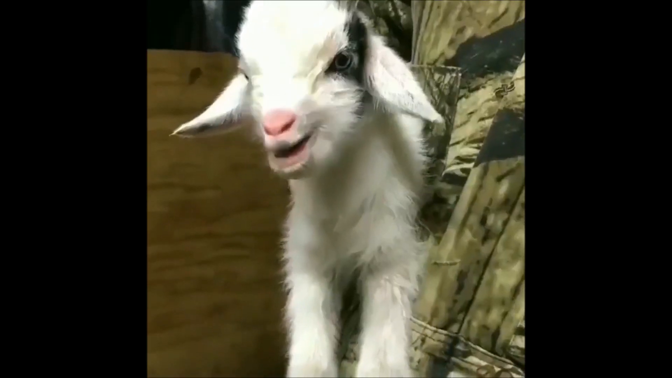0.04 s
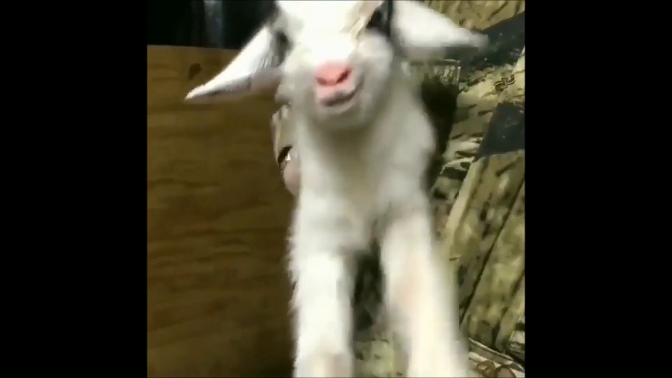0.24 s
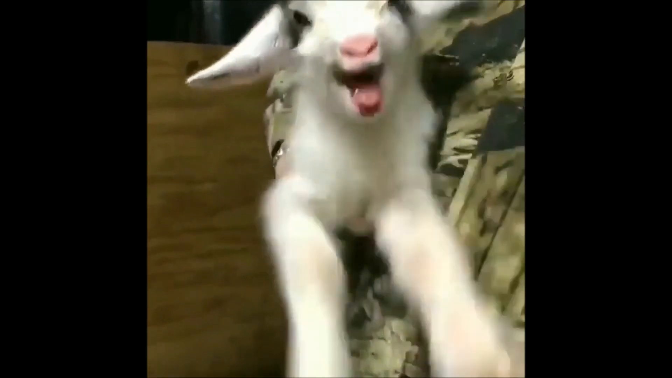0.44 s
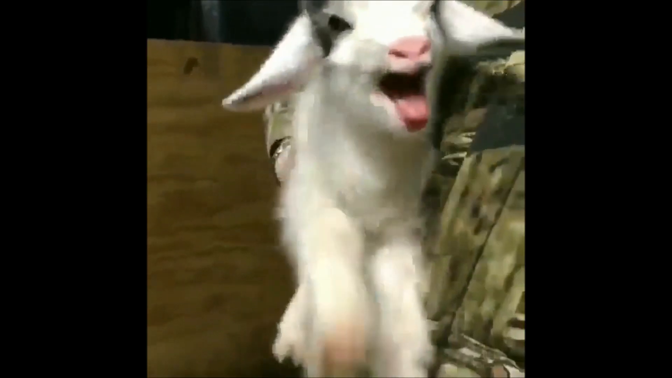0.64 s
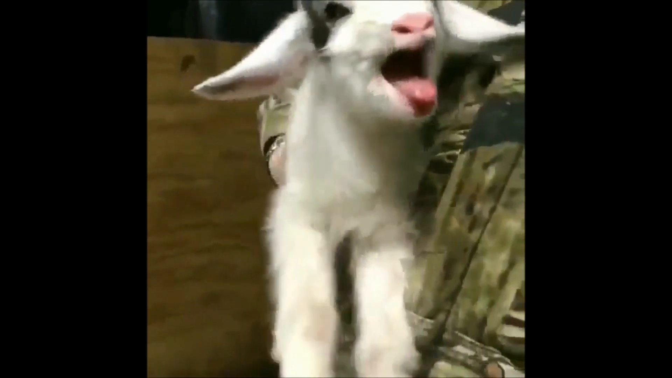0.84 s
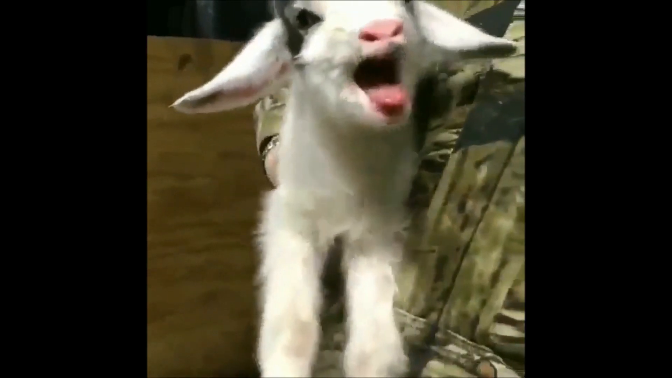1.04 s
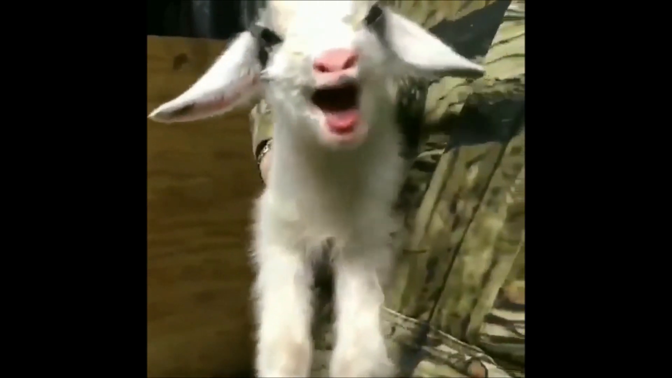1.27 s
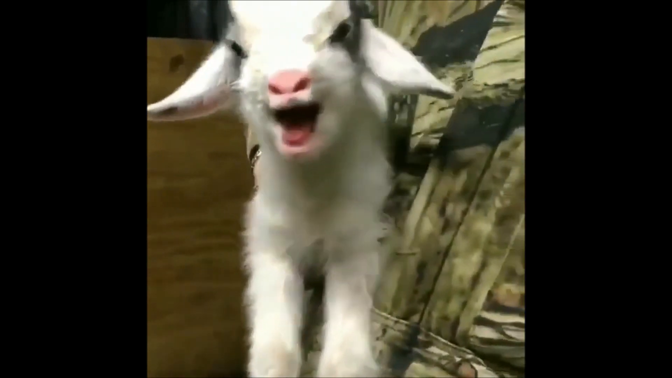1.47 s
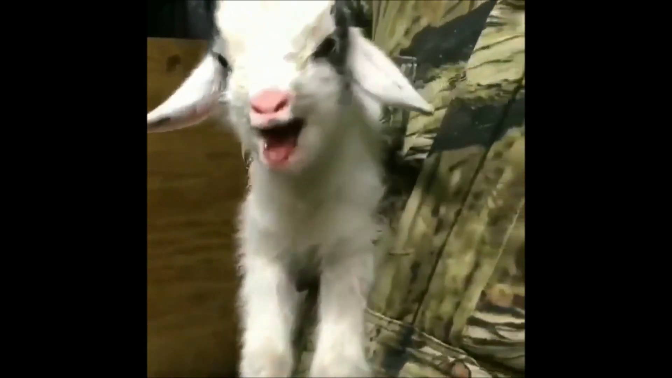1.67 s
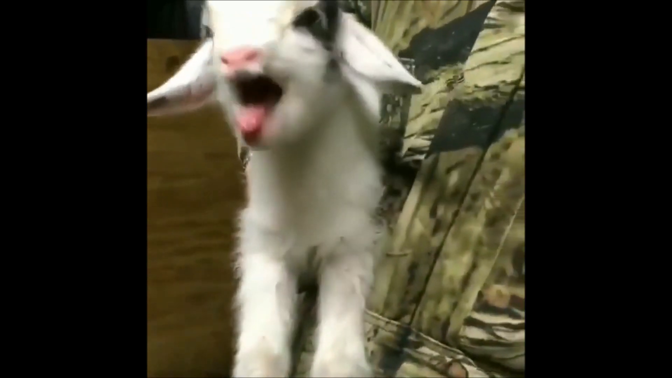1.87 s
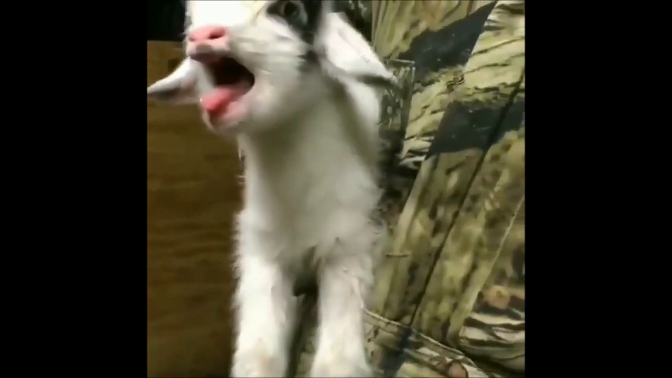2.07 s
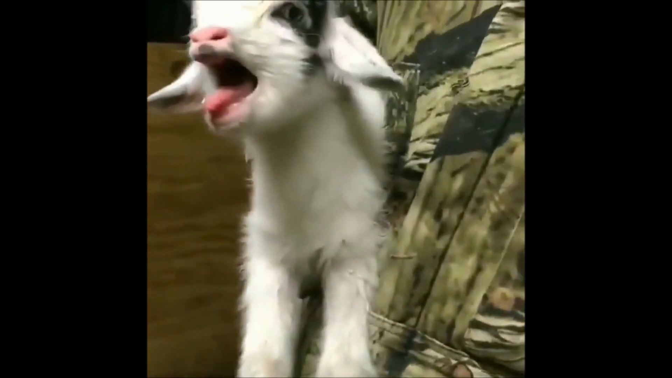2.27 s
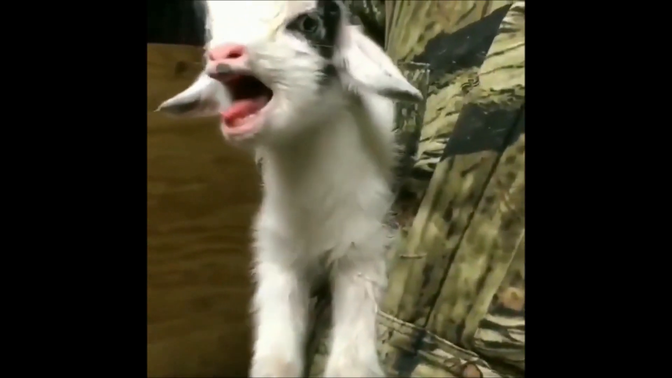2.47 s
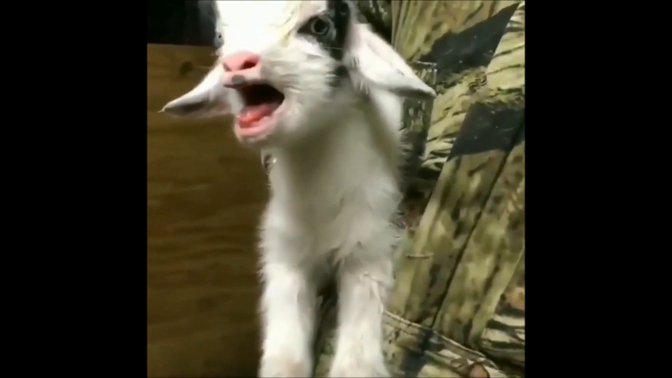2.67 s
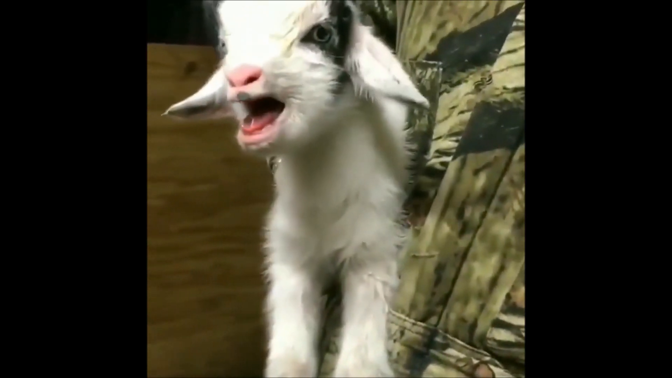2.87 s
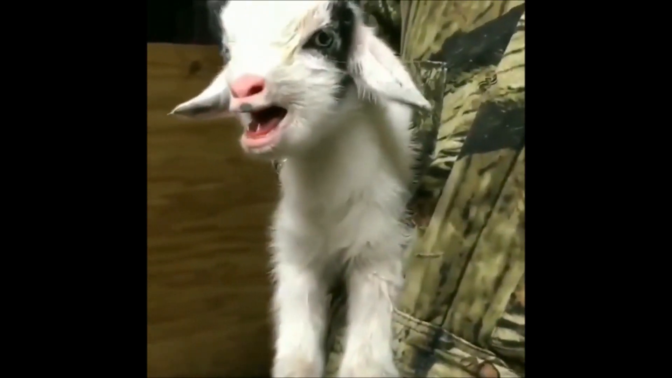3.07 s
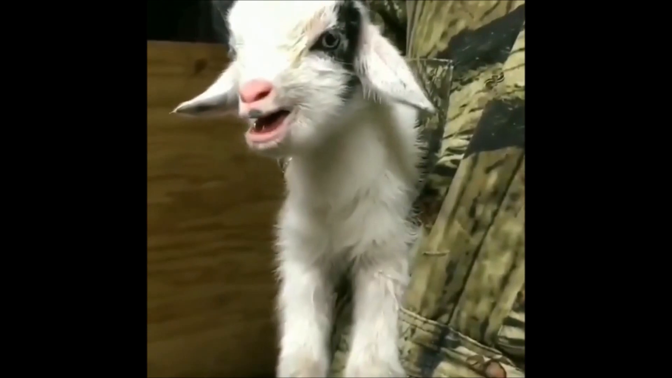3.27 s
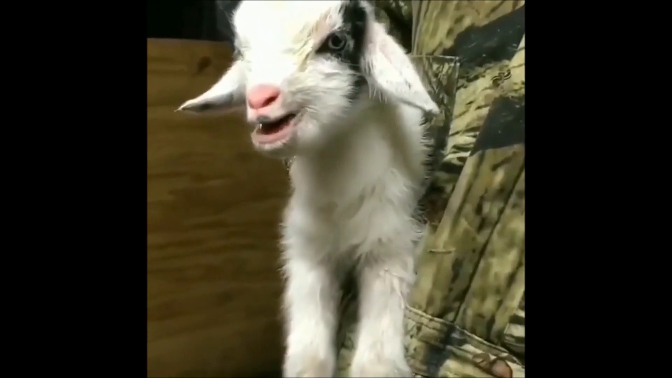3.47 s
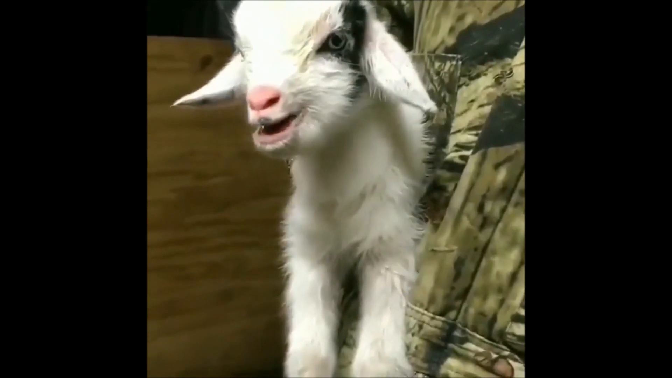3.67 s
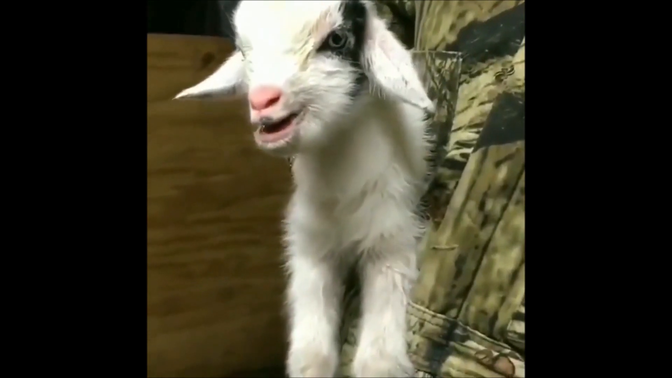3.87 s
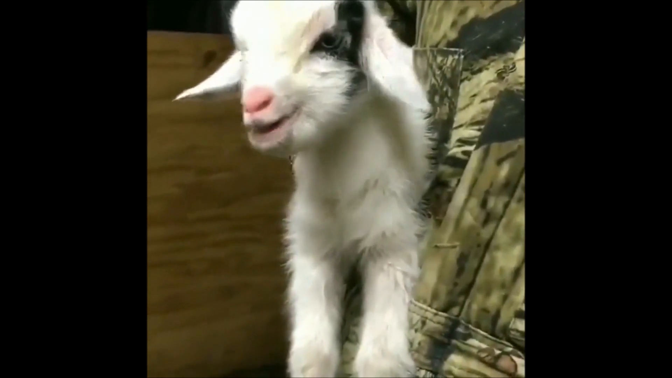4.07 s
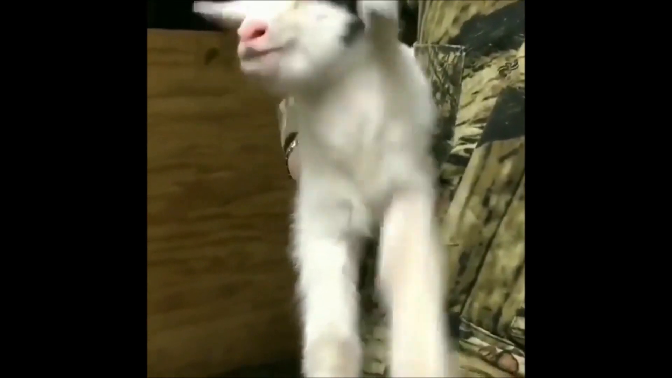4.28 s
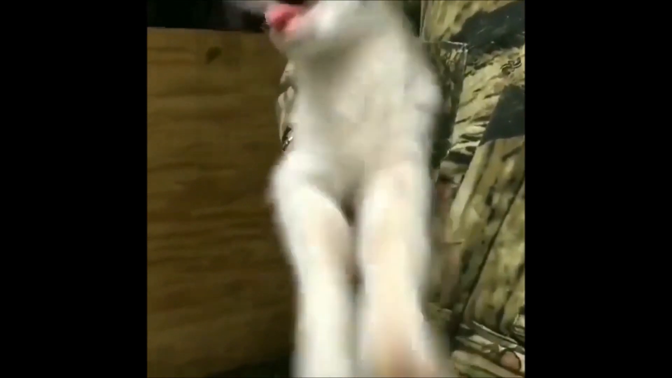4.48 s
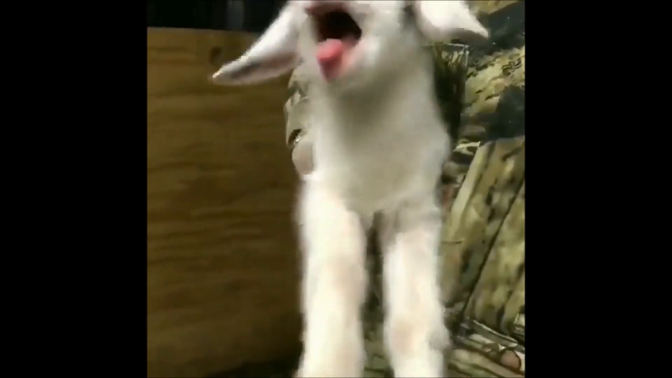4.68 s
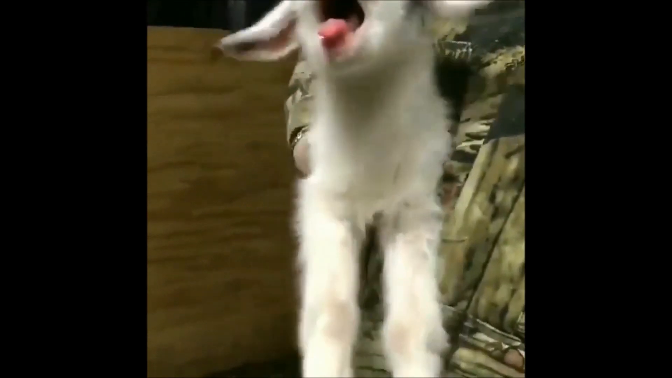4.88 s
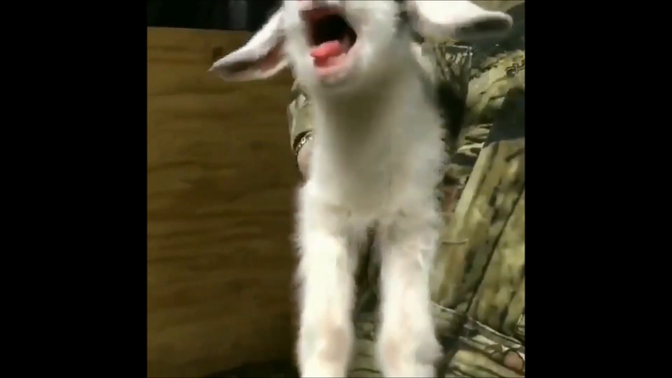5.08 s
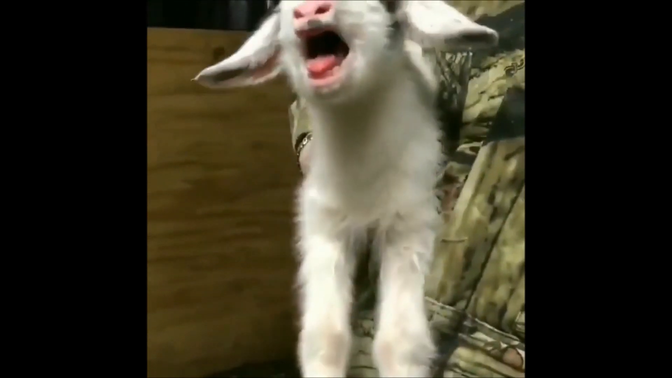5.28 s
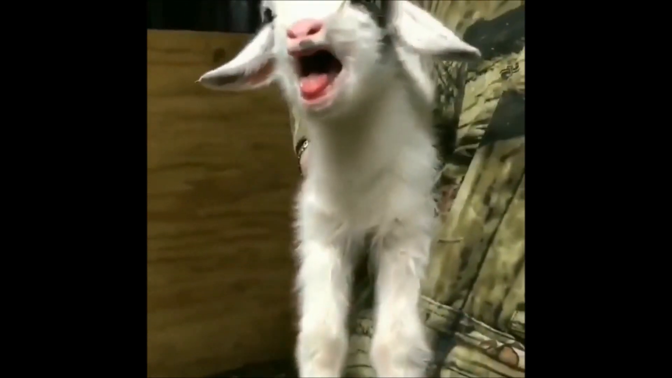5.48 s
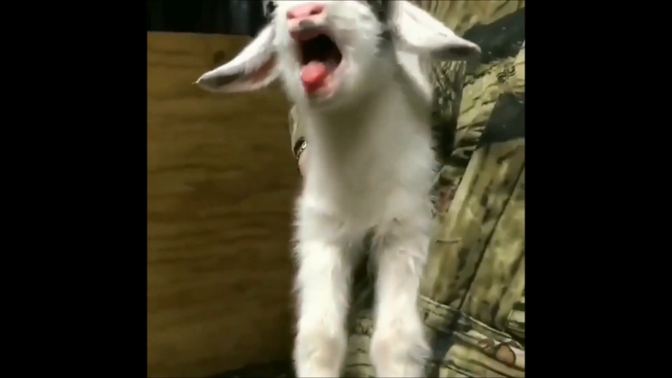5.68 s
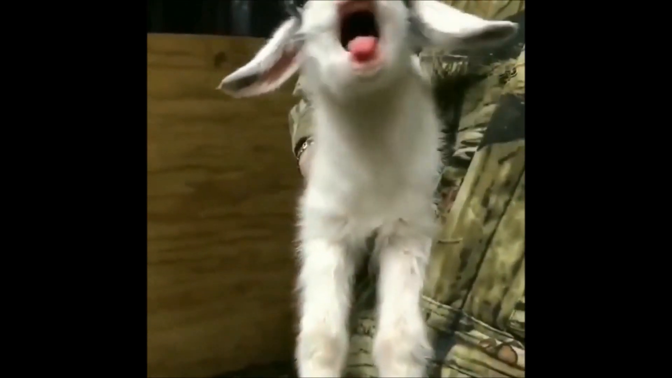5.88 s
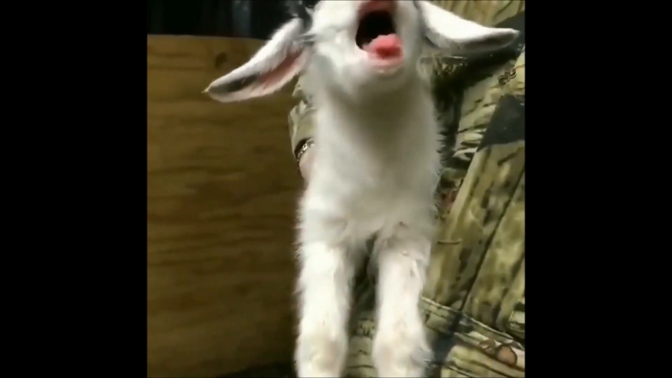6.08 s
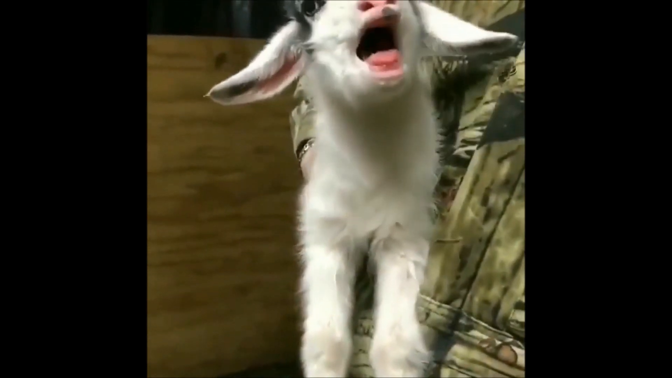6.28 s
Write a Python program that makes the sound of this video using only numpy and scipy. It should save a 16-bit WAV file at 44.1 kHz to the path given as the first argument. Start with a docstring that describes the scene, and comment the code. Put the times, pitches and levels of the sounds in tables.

```python
"""In a small wooden pen, a goat kid close by bleats four times, in two pairs.
Each cry scoops up, quavers once, crests and sags. The vocal folds snap about 700 times a second and
drive the resonances of nose and throat; they slip into long-short pairs and turn hoarse, and the
resonances climb as the mouth opens. The boards return a short echo. Between the cries one hears
a low rumble, a faint hum and a little shuffling."""
import sys
import numpy as np
from scipy import signal
from scipy.fft import rfft, irfft
from scipy.io import wavfile
from scipy.ndimage import uniform_filter1d, minimum_filter1d

SR = 44100
rng = np.random.default_rng(int(sys.argv[2]) if len(sys.argv) > 2 else 0)


def file_out(sig):
    """Save sig as 16-bit WAV at sys.argv[1]."""
    # one column per channel
    cols = np.atleast_2d(sig).T
    # limit, then scale
    lim = np.clip(cols, -1, 1)
    pcm = np.round(lim * 32767).astype(np.int16)
    wavfile.write(sys.argv[1], SR, pcm)


N = 279192

# The cries, one a row, each in four groups:
# timing (start [s], burst into full voice [s], end [s]),
# tune (crest [s], crest [Hz], sag [Hz/s], quaver [s], quaver scale [Hz], scoop [Hz], final drop [Hz]),
# strength (low formants [dB], upper formants [dB], overtone [dB], lead-in [dB], upper fade [dB]),
# manner (mouth opens [s], opening [0-1], hoarseness [0-1], early rasp [0-1], doubling onset [s])
CRIES = [((.403, .444, 1.0693), (.685, 733, 215, .492, 32, 77, 56), (-12, -9.5, -25, -34, 2.5),
         (.51, .62, .16, 0.23, .66)), ((1.678, 1.722, 2.4164), (1.983, 738, 312, 1.825, 37, 148, 80),
         (-13.5, -10, -18, -9, 9.5), (1.69, .7, 0.29, .2, 2.2)), ((4.368, 4.428, 4.997),
         (4.648, 743, 270, 4.488, 27, 90, 65), (-13, -11.5, -29.5, -35.5, 0),
         (4.505, 0.59, 0.27, .02, 4.71)), ((5.402, 5.585, 6.106), (5.66, 703, 119, 5.587, 50, 18, 82),
         (-16.5, -11, -22, -27, 4), (5.41, 0.69, 0.5, .05, 5.52))]
# Resonances of the nose (first row) and throat:
# (mouth narrow [Hz], half open [Hz], wide [Hz], bandwidth [Hz], relative level [dB])
FORMANTS = [(1350, 1300, 1400, 410, -18), (1680, 2200, 2607, 330, -0.5), (3290, 4950, 4750, 530, 8.5),
            (6300, 6610, 6760, 1200, 8), (8700, 8550, 8500, 800, 1.5), (12900, 12000, 12300, 3300, -1)]
# The folds lock briefly into a piercing tone: (centre [s], length [s], frequency [Hz], level [dB])
VOICE_CRACKS = [(.641, .016, 5050, -9.5), (.726, 0.019, 5120, -9), (1.704, .012, 2440, -27),
                (1.879, .017, 4900, -8.5), (1.923, .013, 6600, -13), (5.636, 0.018, 6200, -9)]
# Modes of the mouth after a click: (frequency [Hz], relative level [dB], t60 [s])
CLICK_MODES = [(657, -23, 0.1), (1464, -6, 0.091), (1771, 3.5, .06), (2280, -1.5, .06), (2659, -8, .07),
               (3338, 2, 0.0791), (7200, -2, 0.084)]
# Reflections from the nearest boards: (delay [s], level [dB])
BOARD_ECHOES = [(.0009, -17), (.0019, -10), (.0034, -10)]
# Reverberation time of the pen: (frequency [Hz], t60 [s])
PEN_DECAY = [(500, .22), (2300, 0.35), (3300, .22), (5000, 0.26), (9000, .22), (13000, .17)]
# Soft shuffling movements: (time [s], length [s], scrape level [dB], bump level [dB])
SHUFFLE_EVENTS = [(1.173, 0.26, -63, -69), (1.396, 0.077, -61.5, -60), (2.52, 0.23, -69, -77),
                  (2.697, .11, -62.5, -70), (2.969, 0.09, -75, -53), (3.437, 0.099, -69, -51.5),
                  (5.165, 0.28, -65.5, -65), (6.193, 0.21, -72.5, -56.5)]
# Noise spectra of scrape, bump and background: (frequency [Hz], relative spectral density [dB])
SCRAPE_SPECTRUM = [(200, -13), (1400, -2), (2800, -1), (4500, -5.5), (13000, -14.5)]
BUMP_SPECTRUM = [(25, -25), (80, 10.5), (220, -1), (500, -13), (1400, -17), (3000, -46)]
BACKGROUND_SPECTRUM = [(15, -51.5), (25, -17.5), (40, -12.5), (64, -4), (101, -5.5), (200, -15.5),
                       (339, -17.5), (441, -26.5), (786, -27), (1230, -27), (2140, -36), (2780, -34.5),
                       (6130, -40), (10400, -44.5), (13500, -37.5)]


def bleat(timing, tune, strength, manner, jitter=.0026, crack_rise=.012, crack_dip_db=-7):
    """Source and filter: the folds drive the throat, and a few clean partials ring through the rasp."""
    t = np.arange(timing[0], timing[-1], 1 / SR)
    hz, sag = pitch(t, timing, *tune)
    low_db, upper_db, overtone_db = loudness(t, timing, sag, *strength)
    mouth = mouth_opening(t, timing, *manner[:2])
    locks = cracks(t)
    locked = locks.sum(axis=0)
    hoarse, doubling = (1 - locked) * strain(t, timing, tune[0], sag, *manner[2:])
    cycles = np.cumsum(hz * (1 + jitter * wander(len(t), 46) + crack_rise * locked)) / SR
    edge_hz = 8000 + 2500 * mouth  # a wide mouth lets out more treble
    edge_hz *= np.clip(1 + .009 * (upper_db - upper_db.max()), .5, 1)  # a soft voice has less
    source = -butter(vocal_folds(t, cycles, hoarse, doubling, edge_hz), 1050, "high", order=5)
    low, upper = throat(source, mouth)
    voice = gain_of(low_db) * low + gain_of(upper_db + crack_dip_db * locked) * upper
    # the seventh harmonic sits on the strongest formant
    voice += gain_of(overtone_db) * mouth * (1 - locked) * partial(cycles, 7)
    for lock, (s, _, tone_hz, db) in zip(locks, VOICE_CRACKS):
        harmonic = round(tone_hz / np.interp(s, t, hz))
        voice += lock * gain_of(db) * partial(cycles, harmonic)
    # the fundamental saturates once the folds swing fully, and fades in a crack
    swing = np.tanh(gain_of(low_db + 20)) * (1 - .8 * locked)
    growl = resonate(rng.standard_normal(len(t)), hz / 2, width_hz=360)  # blurred, an octave below
    growl = unit_rms(resonate(growl, hz / 2, width_hz=360))
    voice += swing * (gain_of(-36.5) * partial(cycles, .99) + gain_of(-57) * growl)
    return t[0], voice * signal.windows.tukey(len(t), .02)


def vocal_folds(t, cycles, hoarse, doubling, edge_hz, puff_cycles=.24):
    """Glottal excitation: one sharp pulse a cycle, followed by a puff of turbulent air."""
    n = len(t)
    hz = np.gradient(cycles) * SR
    # rasp and doubling come and go in short patches
    rasp = hoarse * np.clip(1 + .3 * wander(n, 22), .3, 1.6)
    alternation = doubling * np.clip(1 + .5 * wander(n, 30), 0, 1.7) * np.cos(np.pi * cycles)
    # pulses come alternately early and late, and at random when hoarse
    jitter = rasp * (.004 * wander(n, 400) + .03 * hoarse * wander(n, 60))
    cycles = cycles + .018 * alternation + jitter
    pulses = sum(np.cos(2 * np.pi * k * cycles) / np.sqrt(1 + (k * hz / edge_hz) ** 8)
                 for k in range(1, 25))
    shimmer = 1 + .05 * alternation + .11 * rasp * wander(n, 90)
    closure = 1 - .8 * hoarse ** 6  # pulses give way to air when the folds barely close
    puffs = unit_rms((.2 + np.exp(-(cycles % 1) / puff_cycles)) * rng.standard_normal(n))
    air = butter(puffs, 3900, "high", order=2)
    air = butter(air, 10500, "low", order=3)
    return unit_rms(pulses) * shimmer * closure + rasp * air


def throat(source, mouth):
    """Cavity resonance: fluttering formants move with the mouth; a low and an upper group at rms 1."""
    bands = []
    for (*centres_hz, width_hz, db), flutter_db in zip(FORMANTS, np.linspace(1.14, 2, len(FORMANTS))):
        hz = np.interp(mouth, [0, .5, 1], centres_hz)
        gain = gain_of(db + flutter_db * wander(len(source), 48))
        bands.append(gain * resonate(source, hz, width_hz))
    nose, lowest, *upper = bands
    return steady_rms(nose + lowest), steady_rms(sum(upper))


def pitch(t, timing, crest_s, crest_hz, sag_hz_per_s, quaver_s, quaver_hz, scoop_hz, drop_hz):
    """Frequency modulation: an arch with scoop, quaver and drop; also its sag below the crest in Hz."""
    start, _, end = timing
    rounding_s = .058
    sag = sag_hz_per_s * (np.hypot(t - crest_s, rounding_s) - rounding_s)
    u = (t - quaver_s) / .051
    quaver = quaver_hz * u * bell(u)
    scoop = scoop_hz * bell((t - start) / .037)
    drop = drop_hz * step((t - end + .03) / .007)
    return crest_hz - sag - quaver - scoop - drop, sag


def loudness(t, timing, sag, low_db, upper_db, overtone_db, lead_db, fade_db):
    """Amplitude envelopes in dB: the upper formants and overtone burst in later and die sooner."""
    start, burst, end = timing
    dull_lead_db, release_db, sag_db_per_hz = -15.5, -31, .136
    leading = step((burst - t) / .007)
    swell = leading * np.interp(t, [start, burst], [lead_db, -11])
    spent = np.clip((t - burst) / (end - burst), 0, 1)
    low = swell - sag_db_per_hz * sag + release_db * np.exp((t - end) / .0054)
    upper = swell + leading * dull_lead_db - fade_db * spent ** 2 + release_db * np.exp((t - end) / .024)
    return low_db + low, upper_db + upper, overtone_db + upper


def mouth_opening(t, timing, open_s, extent):
    """Articulation (0 narrow, 1 wide): the mouth opens, holds, and gapes wider as the air runs out."""
    gape = .14 * bell((t - timing[-1] + .26) / .038)
    return np.clip(extent * step((t - open_s) / .025) + gape, 0, 1)


def strain(t, timing, crest_s, sag, hoarse, early_rasp, doubling_s, hoarse_per_hz=.0042):
    """Nonlinear vibration: hoarseness grows with the sag and at both ends; period doubling sets in."""
    _, burst, end = timing
    attack = .7 * step((burst - t) / .008)
    attack += early_rasp * step((crest_s - .028 - t) / .015)  # clears just before the crest
    release = .4 * np.exp((t - end) / .04)
    rough = np.clip(hoarse + hoarse_per_hz * sag + attack + release, 0, 1)
    rough *= 1 - .82 * step((burst - .068 - t) / .007)  # a slow lead-in stays nearly clean
    doubling = .2 + .6 * step((t - doubling_s) / .012)
    return np.array([rough, doubling])


def cracks(t):
    """Mode locking: how firmly each crack holds the folds (0-1), one row a crack."""
    return np.array([bell((2 * (t - s) / length) ** 2) for s, length, *_ in VOICE_CRACKS])


def mouth_click(level_db=-41):
    """Free vibration: a tiny click rings in the damped modes of the mouth."""
    t = np.arange(SR // 16) / SR
    ring = sum(gain_of(db - 60 * t / t60) * np.sin(2 * np.pi * hz * t) for hz, db, t60 in CLICK_MODES)
    return gain_of(level_db) * ring / abs(ring).max() * signal.windows.tukey(len(t), .1)


def board_echoes(voice, sway=.044):
    """Comb filtering: near echoes of the treble interfere with the voice and shift as the head moves."""
    t = np.arange(N) / SR
    treble = butter(voice, 4100, "high", order=2)
    return sum(gain_of(db) * np.interp(t - delay * (1 + sway * wander(N, 3.7)), t, treble)
               for delay, db in BOARD_ECHOES)


def pen_reverberation(voice):
    """Reverberation: dense reflections from the boards decay exponentially, each band at its own rate."""
    reflections = rng.standard_normal(SR // 2) * (np.arange(SR // 2) > SR // 250)
    hz, t, bands = signal.stft(reflections, SR, nperseg=256)
    decay = gain_of(-60 * t / at_frequency(PEN_DECAY, hz)[:, None])
    _, tail = signal.istft(bands * decay, SR, nperseg=256)
    return signal.fftconvolve(voice, tail / np.linalg.norm(tail))[:N]


def shuffling():
    """Friction noise: short swells of scraping with a dull bump under them."""
    out, scrape, bump = np.zeros(N), noise(SCRAPE_SPECTRUM), noise(BUMP_SPECTRUM)
    for s, length, scrape_db, bump_db in SHUFFLE_EVENTS:
        blend = gain_of(scrape_db) * scrape + gain_of(bump_db) * bump
        part = blend[round(s * SR):][:round(length * SR)]
        add(out, s, part * signal.windows.tukey(len(part), .6))
    return out


def background(noise_db=-58.5, swell_db=3.5, crossover_hz=400, hum_hz=59, hum_db=-61.5):
    """Random modulation: a rumble swells and a hum wavers in pitch beneath a faint, steady hiss."""
    hum = partial(np.cumsum(hum_hz + 2 * wander(N, 12)) / SR, 1)
    swell = gain_of(swell_db * wander(N, 6.8))
    rumble = swell * butter(noise(BACKGROUND_SPECTRUM), crossover_hz, "low", order=2)
    hiss = butter(noise(BACKGROUND_SPECTRUM), crossover_hz, "high", order=2)
    return gain_of(noise_db) * (rumble + hiss) + gain_of(hum_db) * hum


def resonate(x, hz, width_hz):
    """A damped resonator of gain 1 whose centre follows the curve hz."""
    carrier = np.exp(2j * np.pi * np.cumsum(hz) / SR)
    pole = np.exp(-np.pi * width_hz / SR)
    return 2 * (carrier * signal.lfilter([1 - pole], [1, -pole], x / carrier + 1e-18)).real


def partial(cycles, multiple):
    """A sinusoid of rms 1 at a multiple of the fundamental."""
    return np.sqrt(2) * np.sin(2 * np.pi * multiple * cycles)


def noise(spectrum):
    """Spectral shaping of white noise, at rms 1."""
    gains = gain_of(at_frequency(spectrum, np.fft.rfftfreq(N, 1 / SR)))
    return unit_rms(irfft(rfft(rng.standard_normal(N)) * gains, N))


def wander(count, hz):
    """Random motion of rms 1, low-passed at hz."""
    return unit_rms(butter(rng.standard_normal(count), hz, "low", order=2))


def butter(x, hz, kind, order):
    """A maximally flat low-pass or high-pass."""
    return signal.sosfilt(signal.butter(order, hz, kind, fs=SR, output="sos"), x)


def at_frequency(table, hz):
    """Interpolation on a log-frequency axis."""
    frequencies, values = np.transpose(table)
    return np.interp(np.log(hz + 1), np.log(frequencies + 1), values)


def gain_of(db):
    """Decibels to an amplitude ratio."""
    return 10 ** (np.asarray(db) / 20)


def unit_rms(x):
    """Normalisation to rms 1 overall."""
    return x / np.sqrt(np.mean(x ** 2) + 1e-20)


def steady_rms(x):
    """Normalisation to rms 1 from moment to moment."""
    power = uniform_filter1d(uniform_filter1d(x ** 2, size=600), size=600)
    return x / np.sqrt(abs(power) + 1e-20)


def step(u):
    """A logistic step from 0 to 1 around u = 0."""
    return .5 + .5 * np.tanh(u / 2)


def bell(u):
    """A bell curve of height 1 around u = 0."""
    return np.exp(-u ** 2)


def add(mix, s, sound):
    """Superposition of a sound on the mix at second s."""
    part = mix[round(s * SR):][:len(sound)]
    part += sound[:len(part)]


def scene(reverb_db=-23):
    """Superposition of the kid, its echoes, shuffling and background, alike in both channels."""
    kid = np.zeros(N)
    for cry in CRIES:
        add(kid, *bleat(*cry))
    add(kid, 1.609, mouth_click())  # just before the second bleat
    mono = kid + board_echoes(kid) + gain_of(reverb_db) * pen_reverberation(kid)
    mono = mono + shuffling() + background()
    return np.array([mono, mono])


def record(dry, threshold_db=-22.5, duck_share=.31, recovery_db_per_s=35.5, ceiling=.95, top_hz=13650):
    """Dynamic compression: gain control ducks all during a bleat; a peak limiter and low-pass follow."""
    power_db = 10 * np.log10(abs(uniform_filter1d(dry[0] ** 2, size=400)) + 1e-12)
    recovery_db = recovery_db_per_s * np.arange(N) / SR
    held_db = np.maximum.accumulate(power_db + recovery_db) - recovery_db
    excess_db = np.maximum(held_db - threshold_db, 0)
    ducked = dry / gain_of(duck_share * uniform_filter1d(excess_db, size=200))
    allowed_gain = ceiling / np.maximum(abs(ducked).max(axis=0), ceiling)
    limiter_gain = uniform_filter1d(minimum_filter1d(allowed_gain, size=241), size=241)
    low_pass = signal.firwin(511, top_hz, window=("kaiser", 9), fs=SR)
    return signal.oaconvolve(ducked * limiter_gain, low_pass[None], "same")


dry = scene()
out = record(dry)
file_out(out)
```